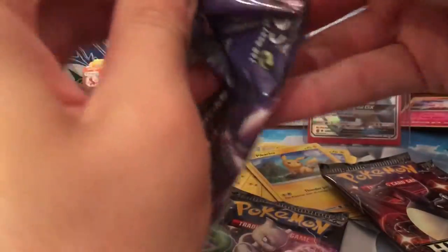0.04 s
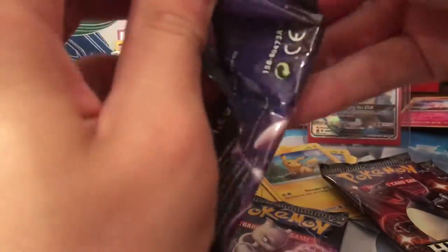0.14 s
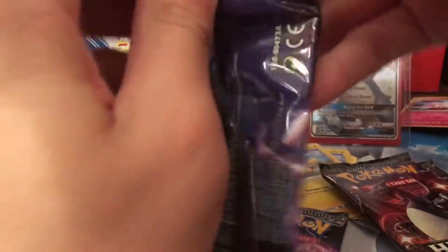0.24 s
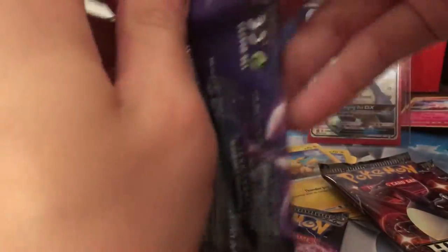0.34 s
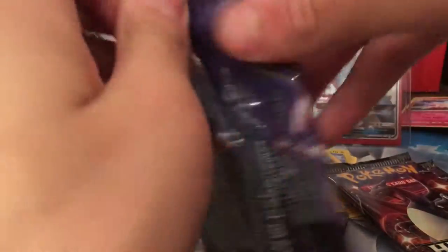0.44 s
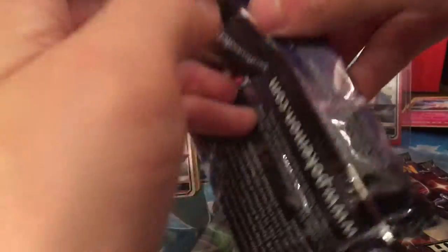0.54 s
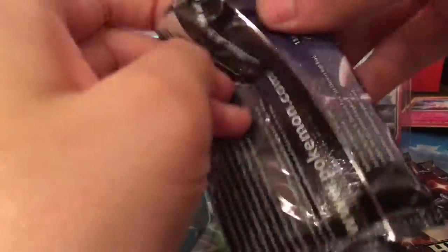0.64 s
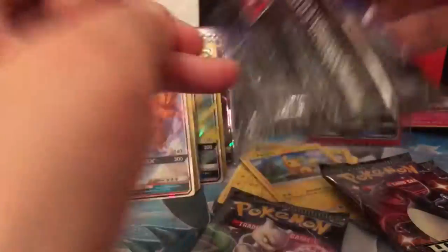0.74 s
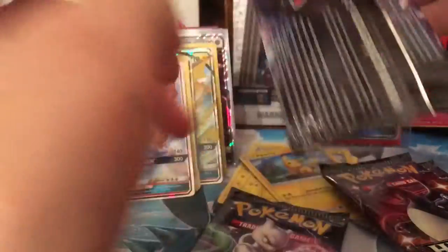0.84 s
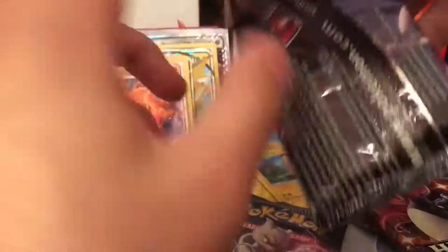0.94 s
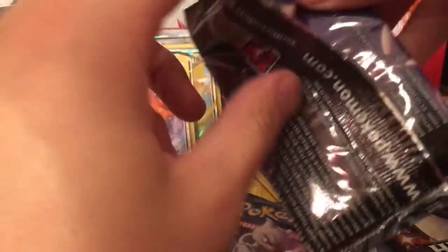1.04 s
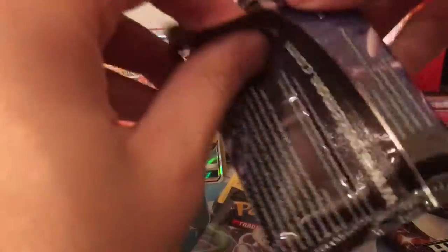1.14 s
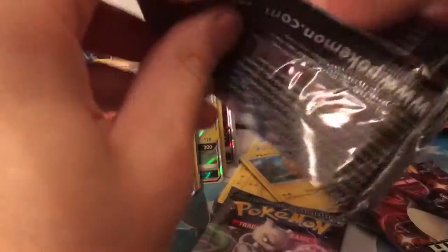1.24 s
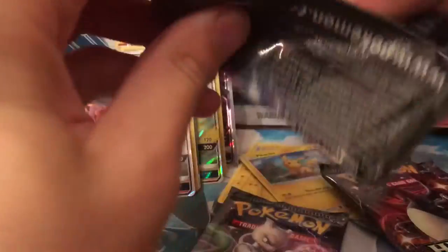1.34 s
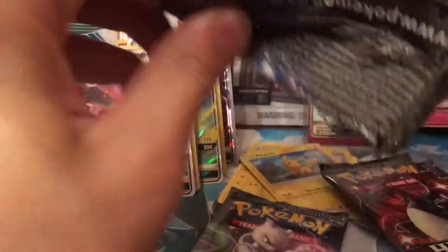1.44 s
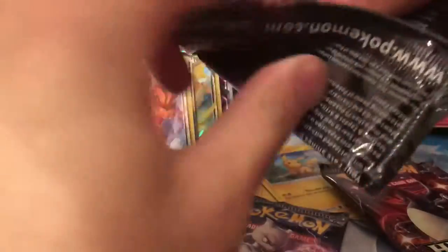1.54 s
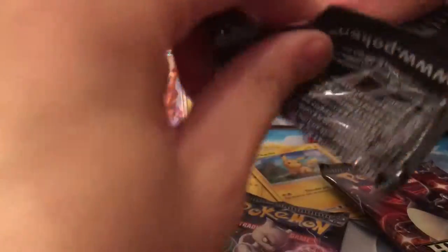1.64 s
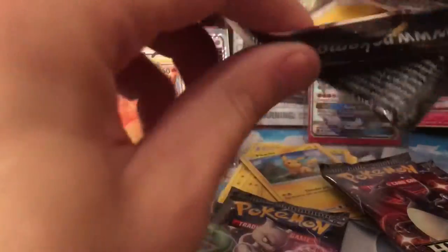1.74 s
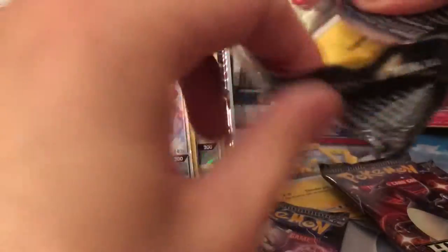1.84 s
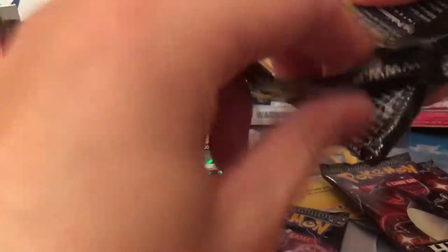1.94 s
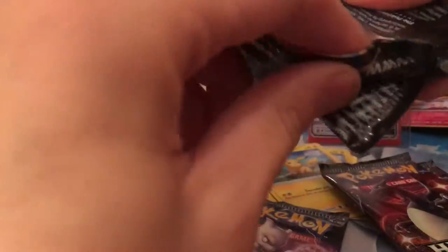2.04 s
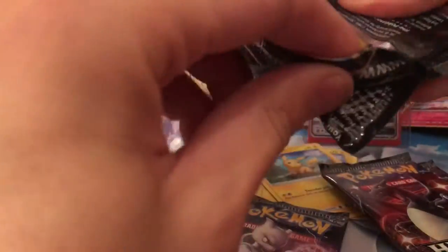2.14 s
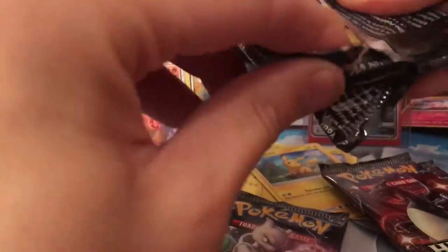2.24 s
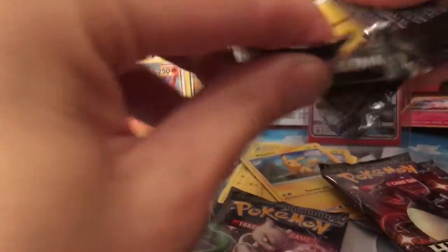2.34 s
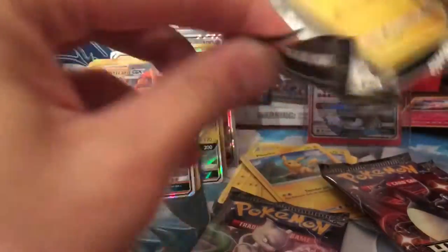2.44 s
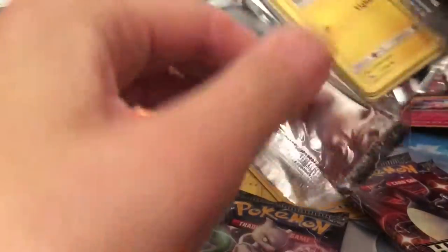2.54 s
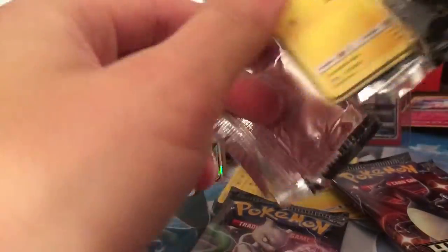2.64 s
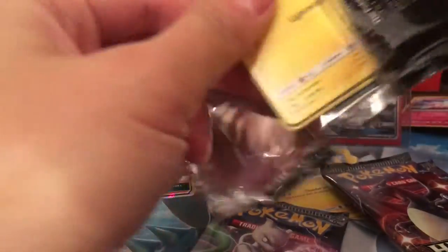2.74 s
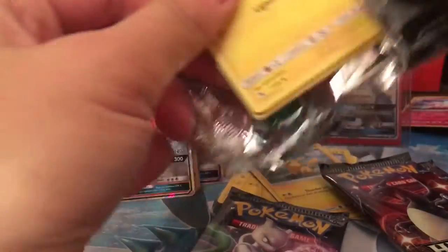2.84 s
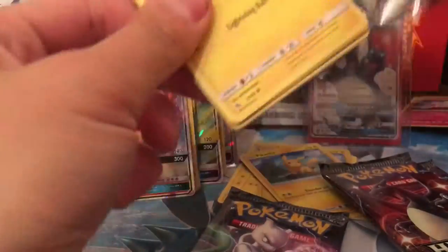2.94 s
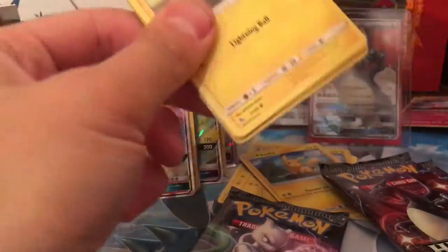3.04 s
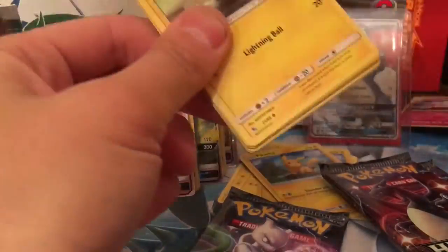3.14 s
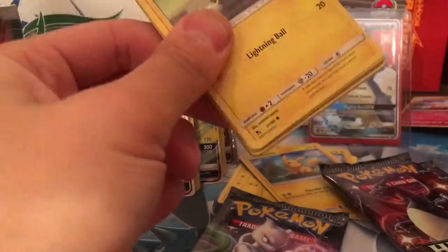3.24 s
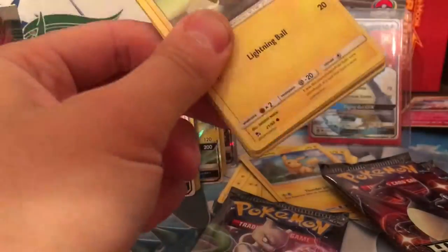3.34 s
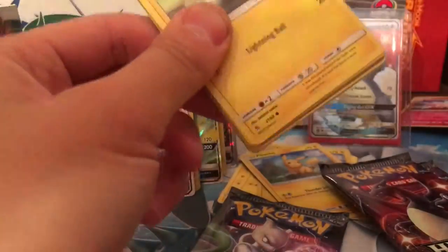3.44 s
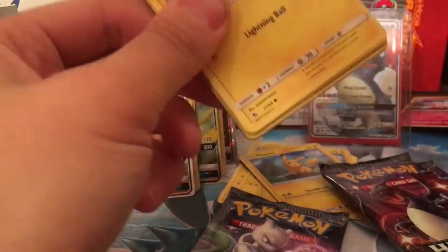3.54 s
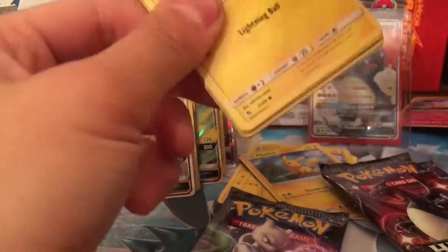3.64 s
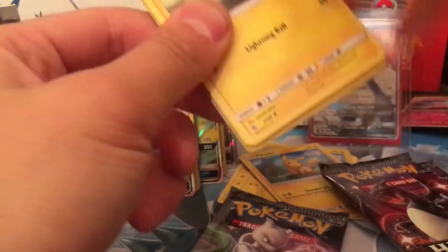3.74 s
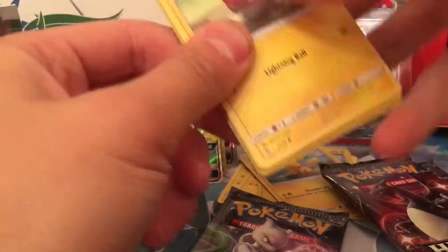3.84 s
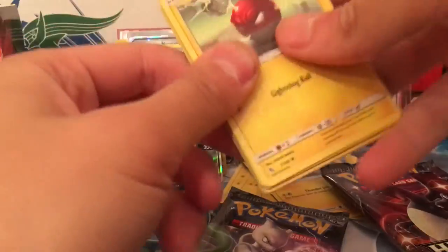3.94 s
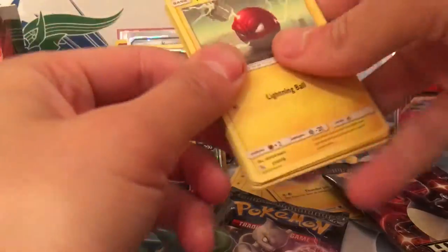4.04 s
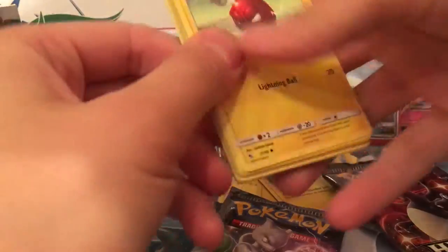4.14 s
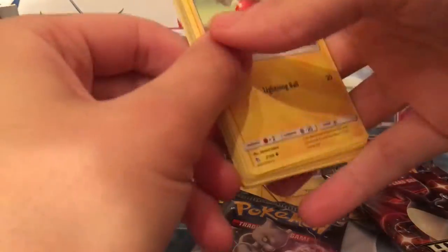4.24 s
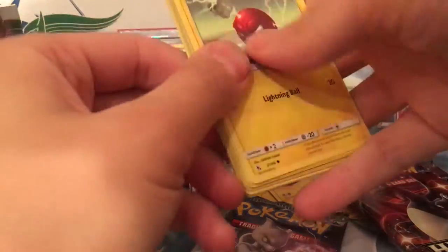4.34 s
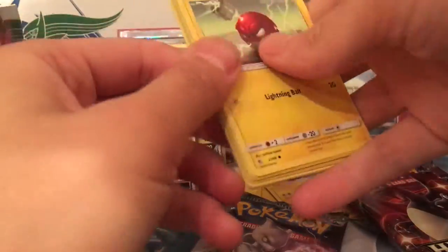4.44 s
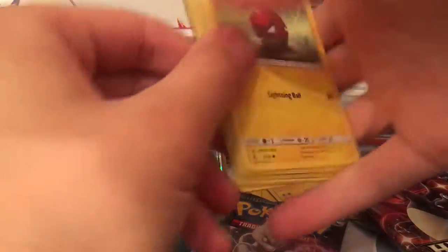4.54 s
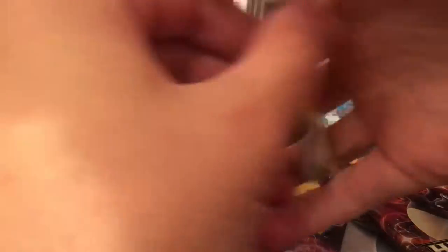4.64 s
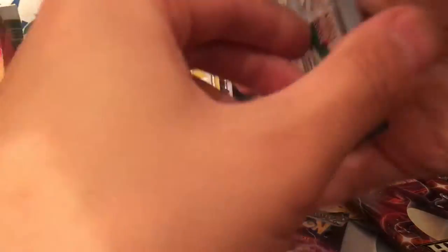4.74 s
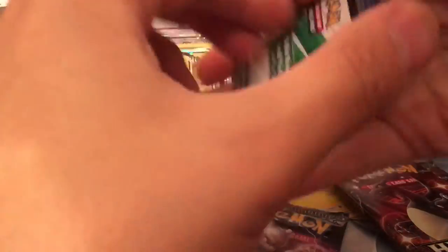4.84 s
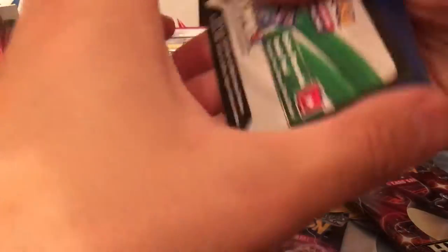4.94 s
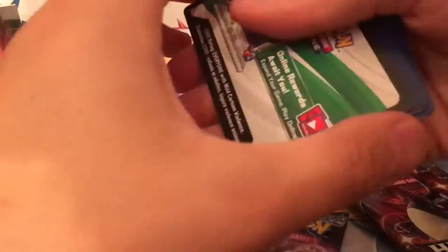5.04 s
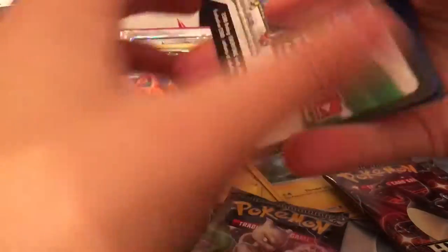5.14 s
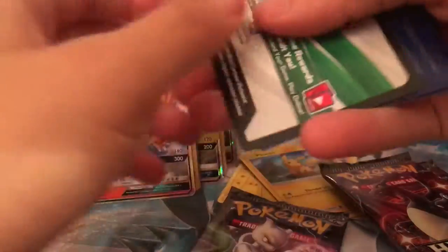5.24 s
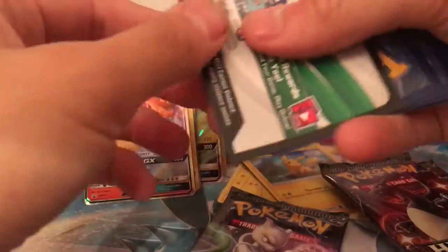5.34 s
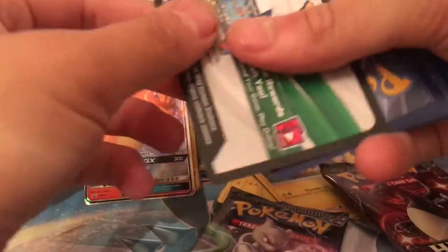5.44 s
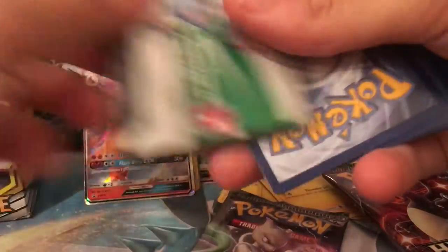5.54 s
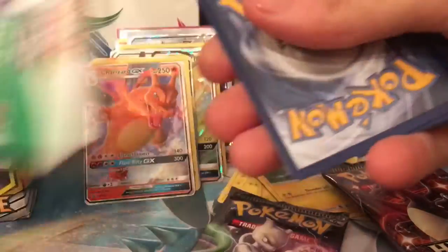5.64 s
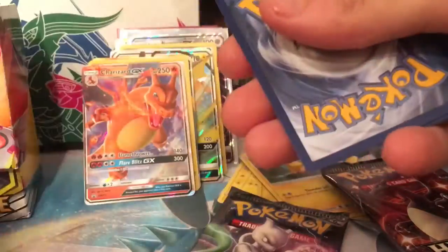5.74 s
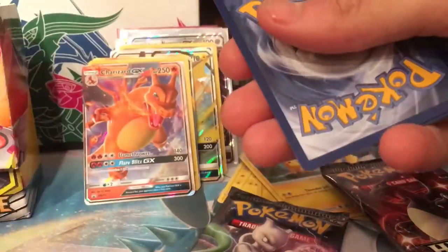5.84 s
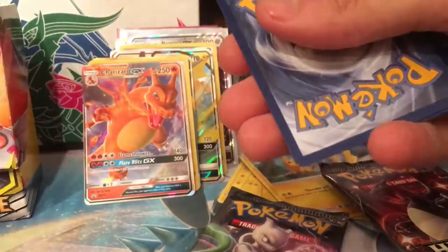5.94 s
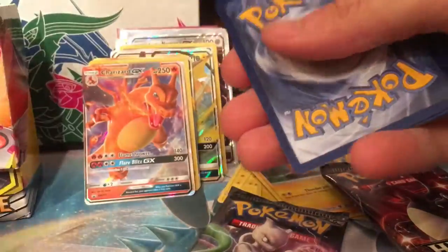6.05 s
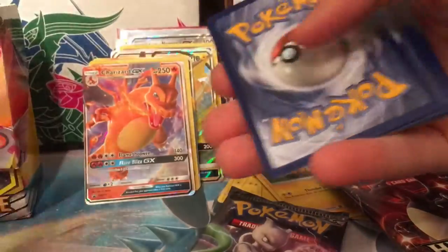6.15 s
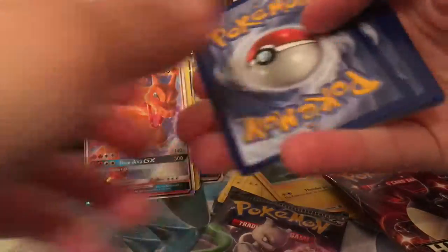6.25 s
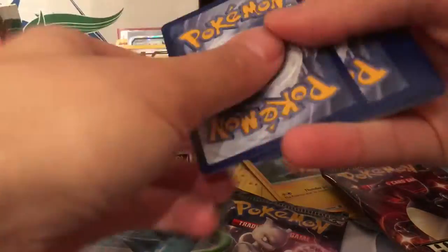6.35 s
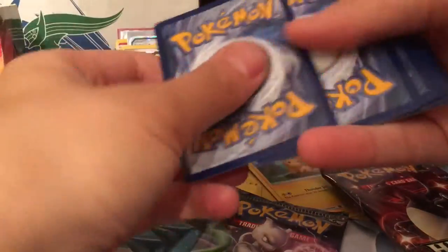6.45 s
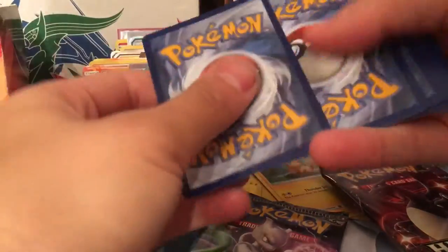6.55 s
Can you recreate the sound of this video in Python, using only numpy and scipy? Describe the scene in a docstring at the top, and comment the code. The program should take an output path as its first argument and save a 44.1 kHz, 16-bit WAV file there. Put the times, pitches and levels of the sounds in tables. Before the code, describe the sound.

Crisp foil crinkling and tearing fills the first half, loudest in a dense run of snaps after a short pause. Soft thumps of hands accompany the cards being drawn out, hissing lightly. The second half is sparse: faint rubs of card on card, light edge clicks and a soft low knock near the end. Close microphone, small quiet room with short reflections and faint low murmur.

```python
"""A foil packet is torn open and crinkled close to the microphone: creases snap over a bed of tiny crackles.
Each snap is a sudden step that rings small facets of the film; the crackles are many tiny random rings.
Cards are pulled out and slid (shaped noise) and flicked (clicks), and one is put down on the table.
Hands bump the pack now and then, with dull noise and low ringing; a small, quiet room answers and murmurs.
Levels in the tables are starting levels: each source then gets its own trim, and the room adds to it."""
import sys
import numpy as np
from scipy import signal
from scipy.fft import rfft, irfft, next_fast_len
from scipy.io import wavfile
from scipy.ndimage import uniform_filter1d, map_coordinates

SR = 44100
rng = np.random.default_rng(int(sys.argv[2]) if len(sys.argv) > 2 else 0)


def dump(signal):
    """Clip the signal to [-1, 1] and save it as 16-bit WAV at the path in sys.argv[1]."""
    limited = np.clip(np.atleast_2d(signal).T, -1, 1)
    pcm = np.round(limited * 32767).astype(np.int16)
    wavfile.write(sys.argv[1], SR, pcm)


N = 290178  # length of the scene in samples
TOP_HZ = 16050  # nothing is kept above this


# Large creases that buckle: (time [s], level [dB], body [dB re level], edge [dB re level],
# ring of the facet [Hz])
CREASE_SNAPS = [(0.1071, -37, -5.5, -8, 1350), (0.1225, -32, -18.5, 4, 9160),
                (0.1769, -20.5, -8, -4.5, 1930), (0.1892, -30, -11, 4, 7910),
                (0.2305, -25.5, 1, -2.5, 1155), (0.2821, -39.5, -12, 1.5, 9090),
                (0.3358, -17.5, -12, -8.5, 4450), (0.3502, -30, -13, -1.5, 4565),
                (0.3581, -26.5, -17, 3.5, 11970), (0.3873, -28.5, -3.5, -3.5, 3860),
                (0.4549, -37.5, -14, -0.5, 2220), (0.5277, -32, -12, -15.5, 4017),
                (0.5618, -28, -5, -1, 2850), (0.5667, -26.5, -5.5, -10.5, 2920),
                (0.5988, -33.5, -4.5, 6, 10600), (0.6045, -35.5, -0.5, 9, 9090),
                (0.7254, -32.5, -11.5, -7.5, 3890), (0.803, -22.5, -7, 5, 10000),
                (0.8142, -21, -16, -6, 3882), (0.9953, -42, -10.5, 0.5, 3980), (1.1378, -39.5, 2, 1, 7840),
                (1.1883, -28, -5, -2, 3620), (1.2171, -27, 4, -10, 1200), (1.2328, -27.5, -25.5, -3, 5860),
                (1.2923, -37.5, -12.5, -2, 3830), (1.3064, -24.5, -31, -9.5, 4000),
                (1.3118, -13.5, -19.5, -13.5, 3300), (1.3451, -33.5, -3.5, -0.5, 4590),
                (1.3662, -36.5, -5, -11, 2330), (1.3962, -32.5, -8.5, -14, 3750),
                (1.4351, -26, -3.5, 4.5, 6136), (1.4583, -30, -9, -0.5, 2070),
                (1.4648, -17.5, -8.5, -3, 2185), (1.4881, -19, -14, -0.5, 3490),
                (1.5078, -17, -7.5, -4.5, 3734), (1.5415, -21, -14.5, -7, 2130),
                (1.5999, -32.5, -8.5, 0, 3750), (1.6147, -32.5, 3.5, -6, 5620),
                (1.654, -39, -2.5, -1, 3920), (1.6863, -31.5, -1, -9.5, 1418),
                (1.7372, -32, -4.5, 4.5, 6740), (1.7601, -17, -13, -4, 2504),
                (1.7742, -21.5, -11, 5.5, 11500), (1.79, -18, -6.5, -6.5, 2744),
                (1.7943, -20, -8.5, -0.5, 9000), (1.8155, -16.5, 0.5, -16, 1178),
                (1.8242, -22.5, -2.5, -14.5, 2150), (1.8462, -34, 5, 3.5, 8460),
                (1.9245, -33, -10, -4.5, 2300), (1.9653, -40.5, 1, 7, 9150),
                (2.0089, -28.5, -6, 7.5, 10920), (2.023, -26.5, -6, 5.5, 10550),
                (2.0485, -19.5, -13.5, -5.5, 2490), (2.1725, -29.5, -11.5, -5, 3940),
                (2.19, -31, -14, 7, 14850), (2.2522, -36.5, -22.5, 0, 4000), (2.2614, -25, -22, 5, 3920),
                (2.3012, -34, -21, -1.5, 3920), (2.3563, -36.5, -11.5, -2.5, 2510),
                (2.4068, -31.5, -11, 6.5, 8650), (2.4132, -31, -22, 5, 14700),
                (2.4266, -23, -11, 5.5, 15210), (2.4372, -25.5, -13, 4, 3900),
                (2.4585, -26.5, -4.5, 1.5, 2200), (2.4966, -18, 0.5, -0.5, 3920),
                (2.5452, -37.5, -2.5, 2.5, 6290), (2.5812, -24, -1, -5.5, 4020),
                (2.5942, -36.5, -3, 4, 1290), (2.6283, -28.5, -2, 1.5, 3710), (2.7188, -34, 1.5, -2, 1380),
                (2.8015, -35.5, -3, 3.5, 6100), (2.8233, -32, -6, -4, 5090), (2.9051, -34, -12.5, 7, 10470),
                (2.9603, -39.5, -3.5, -6.5, 5730), (2.9958, -42.5, 0, -4, 1310),
                (3.0236, -39.5, -6, 1.5, 11220), (3.0569, -44, 3.5, -6, 1460), (3.1338, -47, 3.5, -4, 1450),
                (3.1872, -45, 3, 0.5, 1450), (3.297, -44.5, -13, 4, 13400)]
# Fingers pull or squeeze the film until it yields: (start [s], length [s], level [dB],
# body [dB re level], edge [dB re level])
FILM_PULLS = [(0.15, 0.039, -34, -13, -4), (0.26, 0.036, -40.5, -14, -2.5), (0.335, 0.049, -32, -6.5, -6),
              (0.452, 0.021, -44, 3.5, -3), (0.56, 0.052, -34, -2.5, -1), (0.72, .03, -40.5, -5.5, 2),
              (0.758, 0.037, -26, -4, 4), (0.785, 0.03, -21.5, -7.5, 0.5), (0.875, 0.069, -50, -8, 2),
              (1.03, 0.076, -48, -3, 0.5), (1.17, 0.044, -31, -6, -3.5), (1.36, .04, -42, -4.5, -13),
              (1.42, 0.093, -31.5, -6.5, -4), (1.685, 0.025, -41.5, -1.5, -3),
              (1.76, 0.044, -17, -11.5, -2.5), (1.82, 0.033, -34, 2, 2), (2.01, 0.058, -31.5, -11.5, -7),
              (2.16, 0.078, -42, -27, 5.5), (2.263, 0.039, -39, -30, 5.5), (2.415, 0.052, -27.5, -12, 4),
              (2.457, 0.054, -31.5, 7, 1), (2.58, 0.023, -39, -1, -1.5), (2.63, 0.025, -34, 0, -4.5),
              (2.72, 0.0047, -42.5, 1.5, -4.5), (2.79, 0.05, -45.5, 0.5, -4), (2.958, 0.025, -41.5, 3, 0),
              (3.053, 0.012, -51, 5.5, 1), (3.125, 0.066, -50.5, -1, -2), (3.26, 0.021, -54, -15, 6.5),
              (3.345, 0.052, -50.5, 0.5, 3.5)]
# Light rustle of the packet as it is held: (time [s], level [dB])
HELD_RUSTLE = [(0, -51.5), (0.089, -67.5), (0.15, -46), (0.4, -54.5), (0.5, -65), (0.62, -50), (0.83, -44),
               (0.98, -63), (1.26, -47.5), (1.55, -47), (1.9, -50.5), (2.35, -51), (2.55, -47.5),
               (2.76, -59.5), (2.92, -51), (3.1, -62), (3.42, -67), (3.55, -81.5)]
# Cards sliding out of the packet: (time [s], share of crackle given up to smooth rubbing [0-1]);
# the first and last shares hold before and after
CARD_DRAW = [(2.55, 0.52), (2.92, 0.73), (3.45, 0.3)]
# Broad colour of the foil: (frequency [Hz], level [dB])
FOIL_COLOUR = [(50, -21.5), (150, -6), (290, -1), (420, -7), (900, -7.5), (2000, -3), (5500, 1.5),
               (12000, 4.5), (16000, -1)]
# Resonances of the packet: (centre [Hz], width [Hz], lift [dB])
PACKET_RESONANCES = [(693, 280, 9), (1160, 150, 6), (1396, 300, 6), (2070, 350, 5), (2450, 500, 4),
                     (2860, 180, 5.5), (3810, 630, 7), (4600, 180, 5)]
RIP_DB, RIP_RANGE_DB = -37, 15  # pulls above this start to rip; this much higher, all is rasp


def foil():
    """Large creases snap; the film rustles softly when held and rasps when it is pulled hard."""
    held = strengths(curves(HELD_RUSTLE)[0], body_db=-6.5, edge_db=2)
    worked = effort(FILM_PULLS, held, attack_s=0.016, build_db=3.5, release_s=0.08)

    wrinkles = crackles(rate=520, spread_db=9.5, pitch_hz=2860, pitch_spread=.6, cycles=1.3)
    # the finest creases give dry, bright ticks with hardly any ring
    prickles = crackles(rate=300, spread_db=8, pitch_hz=9720, pitch_spread=0.28, cycles=0.98)
    # cards gliding out of the film hiss more than they crackle
    smooth = np.clip(np.interp(np.arange(N) / SR, *np.transpose(CARD_DRAW)), 0, 1)
    crackling = (1 - smooth) * (0.6 * wrinkles + 0.85 * prickles)
    rustle = unit(crackling + 0.31 * rng.standard_normal(N))

    # under a hard pull the slips come so fast that they merge into a rasp
    rasp = unit(rng.standard_normal(N) * amp(4.5 * wobble(520)))
    pull_db = 20 * np.log10(worked[1] + 1e-9)
    ripping = np.clip((pull_db - RIP_DB) / RIP_RANGE_DB, 0, 1)
    film = np.sqrt(1 - ripping) * rustle + np.sqrt(ripping) * rasp
    film = shifting(film, patchy_db=3.1, size=5)

    bed = played(coloured(film, FOIL_COLOUR, PACKET_RESONANCES), worked, span=0.042)
    bed *= amp(-2.5 + 0.37 * wobble(70))
    snaps = clicks([*CREASE_SNAPS, *strays()], FOIL_COLOUR, PACKET_RESONANCES, rebound_s=0.00055,
                   burst_db=-12.5, burst_t60=0.0072, flutter_db=-26.5, flutter_t60=0.022,
                   facet_db=11, facet_width=0.34)
    return bed + amp(-1.0) * snaps + squeaks()


STRAYS_PER_S, STRAY_DB = 16, 7.5  # lesser creases: how often, typical level over the rustle
STRAY_SCATTER_DB = 5  # spread of their level and colour
STRAY_BODY_DB, STRAY_EDGE_DB, STRAY_HZ = -9.5, -4, 4940  # typical colour re level, typical facet


def strays():
    """Lesser creases give way at uneven intervals, louder the more the packet rustles."""
    times, levels = np.transpose(HELD_RUSTLE)
    slots = np.arange(times[0], times[-1], 1 / STRAYS_PER_S)
    late, size, body, edge, facet = np.clip(rng.standard_normal((len(slots), 5)), -2, 2).T
    s = np.abs(slots + late / STRAYS_PER_S)
    level_db = np.interp(s, times, levels) + STRAY_DB + STRAY_SCATTER_DB * size
    body_db = STRAY_BODY_DB + STRAY_SCATTER_DB * body
    edge_db = STRAY_EDGE_DB + STRAY_SCATTER_DB * edge
    return np.transpose([s, level_db, body_db, edge_db, STRAY_HZ * np.exp(.5 * facet)])


# The film sticks and slips as it parts: (start [s], length [s], starting pitch [Hz], level [dB])
FILM_SQUEAKS = [(0.78, .004, 2261, -23), (0.804, .007, 2450, -16.5)]
SQUEAK_SAG_HZ_PER_S = 32000


def squeaks():
    """A rough tone, its pitch jittering, that sags as the film lets go."""
    track = np.zeros(N)
    for s, length, hz, db in FILM_SQUEAKS:
        gain = swell(length, attack_s=0.00054, build_db=0.5, release_s=0.0084)
        sagging = hz - SQUEAK_SAG_HZ_PER_S * np.arange(len(gain)) / SR
        pitch = sagging * (1 + .2 * rng.standard_normal(len(gain)))
        tone = np.sqrt(2) * np.sin(2 * np.pi * np.cumsum(pitch) / SR)
        add(track, s, amp(db) * gain * tone)
    return track


# One card pushed over another: (start [s], length [s], level [dB], body [dB re level],
# edge [dB re level])
CARD_STROKES = [(3.912, 0.017, -42, -1.5, 1.5), (3.96, .02, -53.5, -0.5, 1),
                (4.03, 0.027, -56.5, 2.5, -5.5), (4.37, 0.011, -64, 1, -1.5), (4.425, 0.036, -68, 4, 4.5),
                (4.595, 0.022, -65.5, -4, 3.5), (4.74, .07, -62, -7.5, 3),
                (4.865, 0.037, -64.5, -16.5, 4.5), (5.005, 0.043, -62.5, -11, 0),
                (5.105, 0.027, -63.5, -2, 2.5), (5.185, 0.029, -63, -9.5, 1.5), (5.28, .14, -65, -6, -5),
                (5.44, .06, -67, 0.5, 3.5), (5.595, .03, -63, -8, 5), (5.625, 0.033, -49, -2, 3.5),
                (5.925, 0.039, -65, 5, -10), (5.995, 0.063, -58, 1.5, -3), (6.11, 0.046, -67.5, -13.5, 2),
                (6.39, 0.037, -67.5, -9, 2), (6.495, .06, -66, -6, 7.5)]
# Faint rubbing of the stack in the hand: (time [s], level [dB])
GRIP_RUB = [(3.9, -82), (4.07, -71), (4.3, -80.5), (4.7, -76.5), (4.85, -72.5), (5.25, -74.5),
            (5.55, -71.5), (5.76, -86), (6.27, -85.5), (6.58, -66)]
# Card edges that flick free: (time [s], level [dB], body [dB re level], edge [dB re level],
# first ring of the card [Hz], second ring [Hz])
EDGE_FLICKS = [(3.767, -54, 2.5, -3, 1402, 4260), (4.800, -52.5, -4, 3, 2700, 4550),
               (4.811, -55.5, -8, 4.5, 2500, 4500), (5.471, -63, 10, 0, 1233, 2380),
               (5.910, -44.5, 5, -10, 2086, 3020), (6.010, -47, -9, -14.5, 2070, 3390),
               (6.055, -42.5, 0.5, -0.5, 1405, 6450), (6.324, -55, -9, -2, 4570, 4800),
               (6.363, -66.5, 3, -6.5, 1400, 2210), (6.441, -49.5, -3, 0.5, 2530, 4750)]
# Broad colour of the cards: (frequency [Hz], level [dB])
CARD_COLOUR = [(60, -3.5), (250, 6.5), (800, -3), (2000, -2.5), (6000, -3.5), (11000, -2), (16000, -6)]
# Resonances of the cards in cupped hands: (centre [Hz], width [Hz], lift [dB])
CUPPED_RESONANCES = [(714, 230, 4), (1330, 400, 6), (3900, 2200, 1.6)]


def cards():
    """Smooth card faces hiss as they slide; their edges tick as they come free."""
    specks = crackles(rate=660, spread_db=8, pitch_hz=3900, pitch_spread=0.93, cycles=1.0)
    faces = rng.standard_normal(N) + 0.37 * specks
    faces = gripped(shifting(faces, patchy_db=2.43, size=16), width=0.24)
    held = strengths(curves(GRIP_RUB)[0], body_db=-6, edge_db=3)
    pushed = effort(CARD_STROKES, held, attack_s=0.0051, build_db=4.0, release_s=0.13)
    rub = played(coloured(faces, CARD_COLOUR, CUPPED_RESONANCES), pushed, span=0.036)
    rub *= amp(-2.5 + 0.99 * wobble(22))
    ticks = clicks(EDGE_FLICKS, CARD_COLOUR, CUPPED_RESONANCES, rebound_s=0.0012,
                   burst_db=-15, burst_t60=0.0044, flutter_db=-26, flutter_t60=0.031,
                   facet_db=10, facet_width=0.12)
    return rub + amp(-2.5) * ticks


# Two resonances of the sliding card shift with the grip: (time [s], lower [Hz], its lift [dB],
# upper [Hz], its lift [dB])
GRIP_RESONANCES = [(3.9, 2210, 6, 4330, 0.5), (4.06, 2300, -1, 3900, 7), (4.37, 2450, 5, 4300, 0),
                   (4.9, 2646, 9.5, 4400, 3), (5.03, 2450, 8, 3900, 1), (5.35, 2450, 6, 4575, 5.5),
                   (5.5, 2390, 4, 4000, 9), (5.65, 2047, 5, 3880, 6), (6.0, 2004, 8, 3395, 2),
                   (6.12, 2400, -1, 4850, 5)]


def gripped(x, width):
    """The card's two resonances glide as the fingers change their hold; width is a share of the pitch."""
    hz, t, z = signal.stft(x, SR, nperseg=512)
    s, *cols = np.transpose(GRIP_RESONANCES)
    lower, lower_db, upper, upper_db = [np.interp(t, s, c) for c in cols]
    db = 0
    for centre, lift in [(lower, lower_db), (upper, upper_db)]:
        db = db + lift / (1 + (2 * (hz[:, None] / centre - 1) / width) ** 4)
    return signal.istft(z * amp(db), SR, nperseg=512)[1][:N]


# The stack bends as it is drawn out and turned: (start [s], length [s], level [dB])
STACK_FLEXES = [(0.785, 0.05, -44.5), (2.448, 0.039, -40), (2.58, 0.28, -48), (2.95, 0.051, -44.5),
                (3.03, 0.16, -49), (3.348, 0.025, -46), (3.909, 0.12, -56.5)]
# Soft bumps of hands and cards: (time [s], table level [dB], card stack level [dB])
HAND_BUMPS = [(0.353, -38.5, -53), (0.803, -48, -29.5), (1.213, -40, -28.5), (1.467, -43, -33.5),
              (2.074, -40.5, -61), (2.499, -50, -38), (2.655, -42, -36), (2.724, -35, -38),
              (2.802, -33, -44), (2.824, -34, -43.5), (2.996, -49, -39), (5.645, -40.5, -49.5),
              (5.913, -48.5, -41.5), (6.058, -31.5, -41)]
# Ringing of the table: (frequency [Hz], typical level [dB], time to fall 60 dB [s])
TABLE_MODES = [(105, -3.5, 0.14), (152, -7, 0.073), (256, -14, 0.03)]
# Colour of the knock of the stack: (frequency [Hz], level [dB])
STACK_COLOUR = [(60, -9), (150, 0.5), (280, 2), (400, -6), (560, -6.5), (1100, -31), (4000, -50)]
# Colour of the dull flexing: (frequency [Hz], level [dB])
THUD_COLOUR = [(25, -28), (55, -6.5), (100, 2), (250, 2), (400, -8), (700, -26), (2000, -49.5)]


def hands():
    """Dull flexing of the stack, and bumps that ring the table and knock the cards together."""
    bend = np.zeros(N)
    for s, length, db in STACK_FLEXES:
        # the negative build makes each flex ease off from its start
        add(bend, s, amp(db) * swell(length, attack_s=0.014, build_db=-2.5, release_s=0.29))
    unsteady = amp(-6 + 5.8 * wobble(42))
    sound = bend * unsteady * unit(coloured(rng.standard_normal(N), THUD_COLOUR))
    t = np.arange(SR // 15) / SR
    for s, table_db, stack_db in HAND_BUMPS:
        # the loose cards are too damped to ring: a short burst of noise
        knock = coloured(rng.standard_normal(len(t)) * amp(-60 * t / 0.012), STACK_COLOUR)
        add(sound, s, amp(stack_db - 9.0) * unit(knock))
        add(sound, s, amp(table_db - 0.5) * ringing(TABLE_MODES, attack=0.0019))
    return sound


def ringing(modes, attack):
    """Damped modes after a soft blow, at slightly new strengths each time."""
    t = np.arange(SR // 3) / SR
    ring = np.zeros(len(t))
    for hz, db, t60 in modes:
        ring += amp(db + rng.normal(0, 1.0) - 60 * t / t60) * np.sin(2 * np.pi * hz * t)
    return ring * (1 - np.exp(-t / attack))


# How long the room rings: (frequency [Hz], time to fall 60 dB [s])
ROOM_DECAY = [(150, .25), (4000, 0.13), (15000, 0.082)]
REFLECT_HZ = 351  # echoes fade below this


def room(x, near_db, near_t60, tail_db):
    """Quick echoes off the table and boxes, then the faint tail of the room, both as fading noise."""
    hz, t, z = signal.stft(rng.standard_normal(SR // 2), SR, nperseg=256)
    fade = amp(-60 * t / along(ROOM_DECAY, hz)[:, None])
    tail = signal.istft(z * fade, SR, nperseg=256)[1]
    t = np.arange(len(tail)) / SR
    near = rng.standard_normal(len(t)) * amp(-60 * t / near_t60) * (t > .001)
    echo = amp(near_db) * near / np.linalg.norm(near) + amp(tail_db) * tail / np.linalg.norm(tail)
    # small things on the table throw back little bass
    return x + filtered(signal.fftconvolve(x, echo)[:N], lambda hz: hz / np.hypot(hz, REFLECT_HZ))


# Colour of the room's murmur: (frequency [Hz], level [dB])
AIR_COLOUR = [(20, -23), (50, 2), (100, 2.5), (200, 1.5), (320, -3), (500, -12), (1000, -17), (2500, -22.5),
              (6000, -27), (16000, -32.5)]


def air():
    """The low, steady murmur of the room, made of shaped noise."""
    return amp(-66.0) * unit(coloured(rng.standard_normal(N), AIR_COLOUR))


def clicks(rows, spectrum, resonances, rebound_s, burst_db, burst_t60,
           flutter_db, flutter_t60, facet_db, facet_width):
    """A faint noise swells for up to 10 ms, then comes one sharp step that rings the facets,
    a rebound and a fading flutter of noise."""
    track = np.zeros(N)
    t = np.arange(-SR // 100, SR // 25) / SR
    before, after = np.maximum(-t, 0), np.maximum(t, 0)
    burst = amp(burst_db - 60 * after / burst_t60) * (t >= 0)
    flutter = amp(flutter_db - 60 * after / flutter_t60 - 60 * before / 0.023)
    for s, db, body_db, edge_db, *facets_hz in rows:
        force = np.hypot(burst, flutter) * rng.choice([-1, 1], len(t)) + (t == 0)
        force[np.searchsorted(t, rebound_s * rng.uniform(.5, 2))] -= .5
        # nearby facets join in
        neighbours_hz = 3100 * np.exp(.55 * rng.standard_normal(size=3))
        neighbours = [(hz, 0.28 * hz, 5.5) for hz in neighbours_hz]
        facets = [(hz, facet_width * hz, facet_db) for hz in facets_hz]
        click = coloured(force, spectrum, [*resonances, *neighbours, *facets])
        # level each register as if its energy filled 5 ms
        parts = unit(registers(click)) * np.sqrt(.005 * SR / len(t))
        add(track, s + t[0], strengths(db, body_db, edge_db) @ parts)
    return track


def crackles(rate, spread_db, pitch_hz, pitch_spread, cycles):
    """Tiny facets flip at random, rate a second; each rings for a few cycles at its own pitch."""
    start = rng.integers(0, N, int(rate * N / SR))
    size, pitch = np.clip(rng.standard_normal((len(start), 2)), -2, 2).T[:, :, None]
    hz = np.minimum(pitch_hz * np.exp(pitch_spread * pitch), TOP_HZ)
    k = np.arange(SR // 200)
    turns = hz * k / SR
    rings = amp(spread_db * size) * np.sqrt(hz) * np.cos(2 * np.pi * turns) * np.exp(-turns / cycles)
    rings *= rng.choice([-1, 1], (len(start), 1))
    return unit(np.bincount((start[:, None] + k).ravel(), rings.ravel(), N)[:N])


def shifting(x, patchy_db, size):
    """The colour of a sheet drifts as it bends; a patch lasts size frames of about 6 ms."""
    z = signal.stft(x, nperseg=512)[2]
    field = uniform_filter1d(rng.standard_normal(z.shape), size=7, axis=0)
    field = uniform_filter1d(field, size=size, axis=1)
    return unit(signal.istft(z * amp(patchy_db * field / field.std()), nperseg=512)[1][:N])


def swell(length, attack_s, build_db, release_s):
    """Gain of one hand movement: it takes hold, changes by build_db over its length, and lets go."""
    t = np.arange(int((length + release_s) * SR)) / SR
    db = -build_db * np.maximum(1 - t / length, 0) - 60 * np.maximum(t - length, 0) / release_s
    return amp(db) * (1 - np.exp(-t / attack_s))


def effort(moves, resting, attack_s, build_db, release_s):
    """Gains of the three registers: the movements add their power to that of the resting hands."""
    power = resting ** 2
    for s, length, db, body_db, edge_db in moves:
        shape = swell(length + attack_s, attack_s, build_db, release_s)
        add(power, s - attack_s, np.outer(strengths(db, body_db, edge_db), shape) ** 2)
    return np.sqrt(power)


def played(texture, gains, span):
    """A texture whose registers follow a gesture, free to flicker within span seconds."""
    parts = registers(texture)
    power = np.abs(uniform_filter1d(parts ** 2, max(int(span * SR), 2), axis=1))
    even = parts / np.sqrt(power + 1e-4 * power.mean(axis=1, keepdims=True))
    return np.sum(gains * even, axis=0)


def registers(x, body_hz=1800, edge_hz=6000):
    """Split a sound into its dull body, its middle and its sharp edge."""
    def response(hz):
        body = 1 / (1 + (hz / body_hz) ** 8)
        no_edge = 1 / (1 + (hz / edge_hz) ** 10)
        return np.array([body, no_edge - body, (1 - no_edge) * (hz < TOP_HZ)])
    return filtered(x, response)


def strengths(db, body_db, edge_db):
    """Gains of the three registers: body, middle and edge."""
    return amp([db + body_db, db, db + edge_db])


def coloured(x, spectrum, resonances=()):
    """x through a body that rings only after it is struck (minimum phase): a spectrum with resonances."""
    def response(hz):
        db = along(spectrum, hz)
        for centre, width, lift in resonances:
            db = db + lift / (1 + (2 * (hz - centre) / width) ** 2)
        # folding the cepstrum forward in time gives the minimum phase
        cepstrum = irfft(np.log(amp(db)))
        cepstrum[1:len(hz) - 1] *= 2
        cepstrum[len(hz):] = 0
        return np.exp(rfft(cepstrum))
    return filtered(x, response)


def filtered(x, response):
    """x times a response of frequency."""
    m = 2 * next_fast_len(x.shape[-1] // 2 + SR // 20)
    return irfft(rfft(x, m) * response(np.fft.rfftfreq(m, 1 / SR)), m)[..., :x.shape[-1]]


def wobble(rate):
    """A smooth random curve, rate knots a second."""
    knots = rng.standard_normal(int(N * rate / SR) + 4)
    return map_coordinates(knots, [np.arange(N) * rate / SR])


def curves(rows):
    """One value per sample for each column after the time; -120 dB outside the rows."""
    s, *cols = np.transpose(rows)
    return [np.interp(np.arange(N) / SR, s, c, left=-120, right=-120) for c in cols]


def along(points, hz):
    """(Hz, value) points read on a log axis."""
    f, v = np.transpose(points)
    return np.interp(np.log(hz + 1), np.log(f + 1), v)


def add(track, s, sound):
    """Mix a sound into a track at time s."""
    part = track[..., max(round(s * SR), 0):][..., :sound.shape[-1]]
    part += sound[..., :part.shape[-1]]


def unit(x):
    """Scale each row to rms 1."""
    return x / np.sqrt(np.mean(x ** 2, axis=-1, keepdims=True) + 1e-20)


def amp(db):
    """Decibels to gain."""
    return 10 ** (np.asarray(db) / 20)


def scene():
    """Everything happens within reach of one microphone."""
    handling = foil() + cards() + hands()
    return (room(handling, near_db=-11, near_t60=0.042, tail_db=-17.5) + air())[None]


BOTTOM_HZ = 46.6  # the microphone fades below this


def record(dry):
    """The microphone sheds the deep bass and the recorder keeps nothing above its band limit."""
    return filtered(dry, lambda hz: (hz < TOP_HZ) * hz ** 4 / np.hypot(hz ** 4, BOTTOM_HZ ** 4))


dry = scene()
out = record(dry)
dump(out)
```